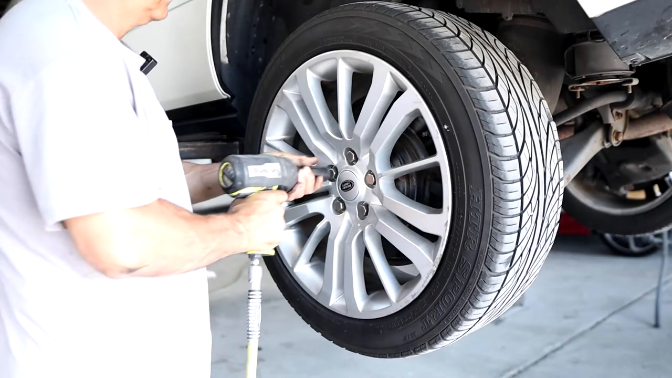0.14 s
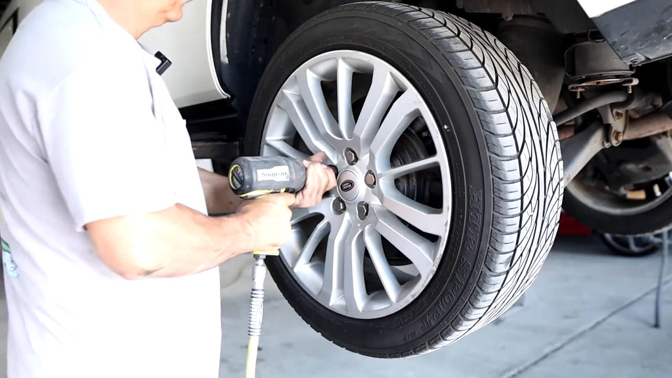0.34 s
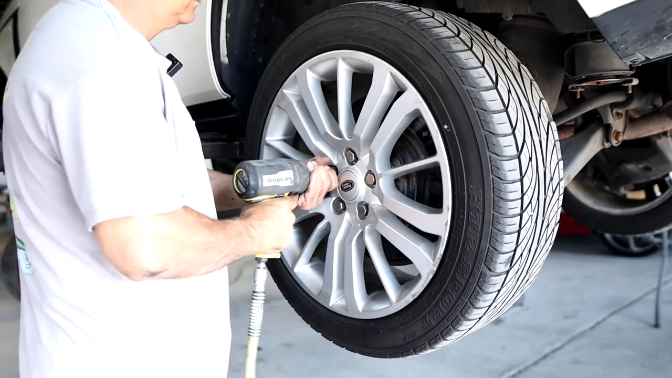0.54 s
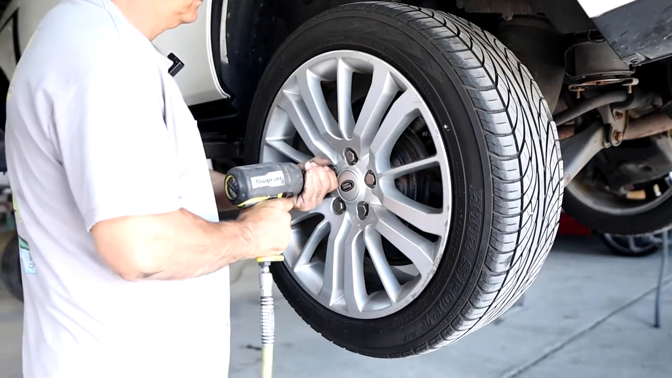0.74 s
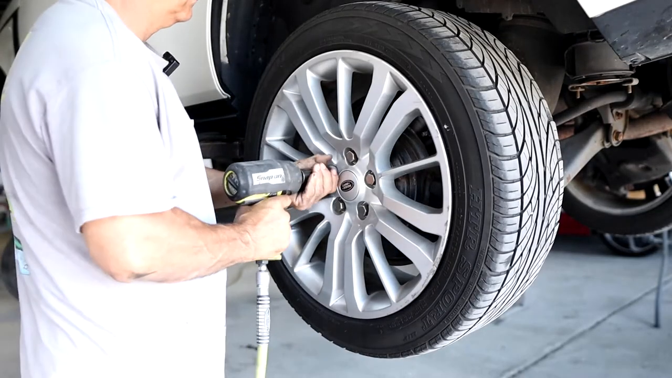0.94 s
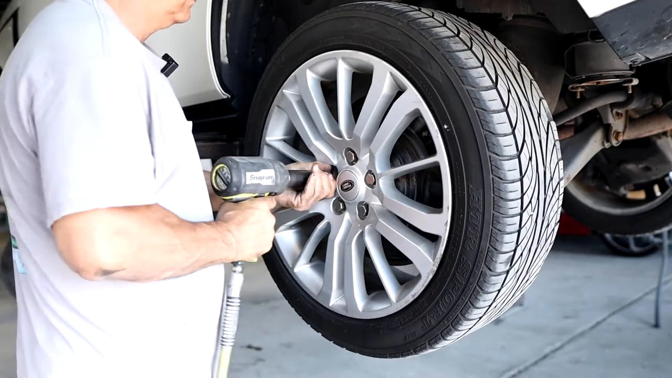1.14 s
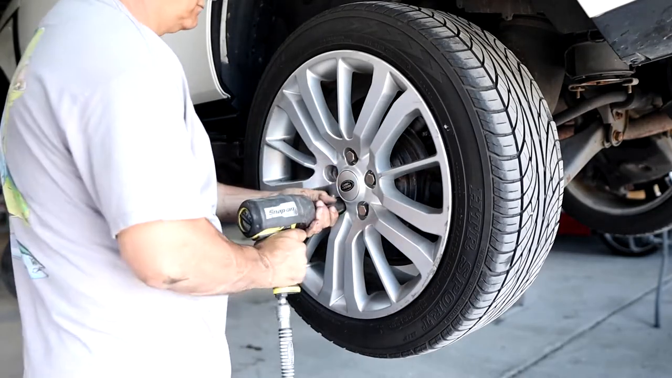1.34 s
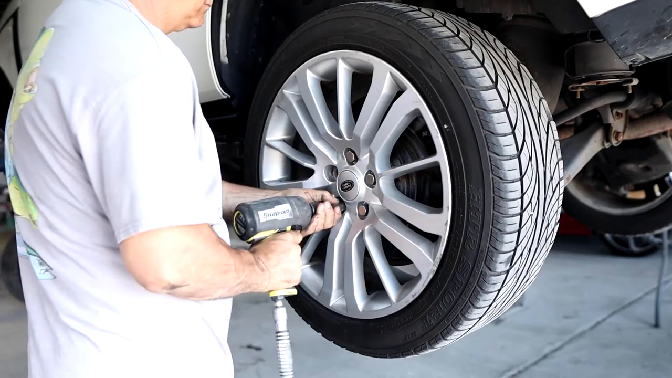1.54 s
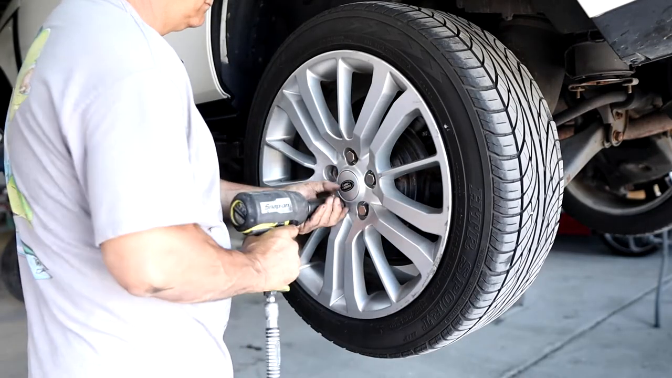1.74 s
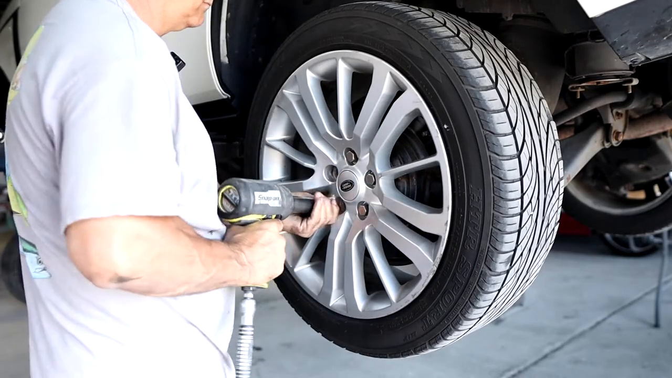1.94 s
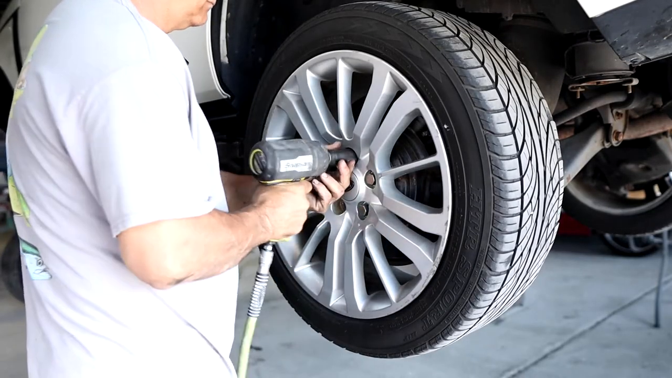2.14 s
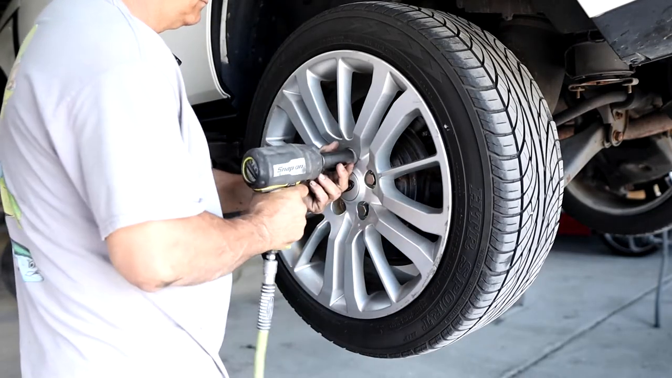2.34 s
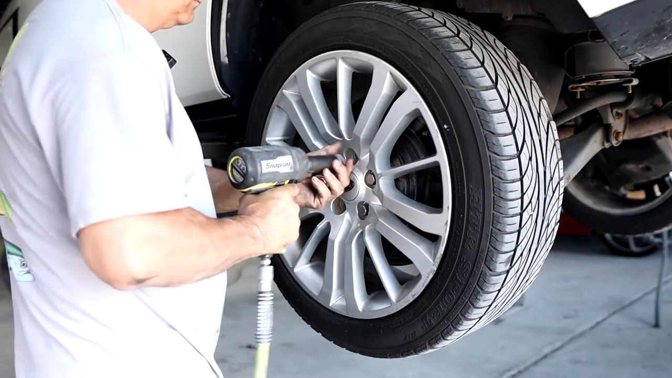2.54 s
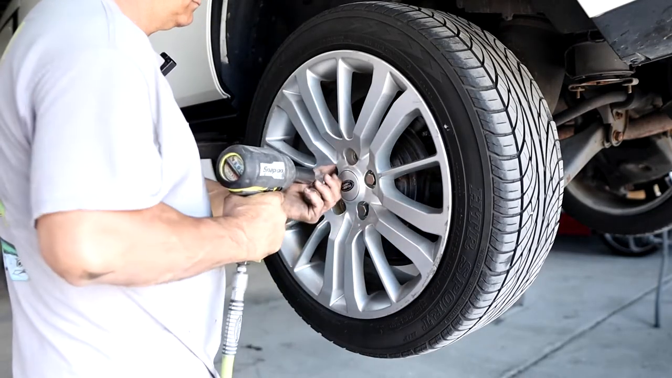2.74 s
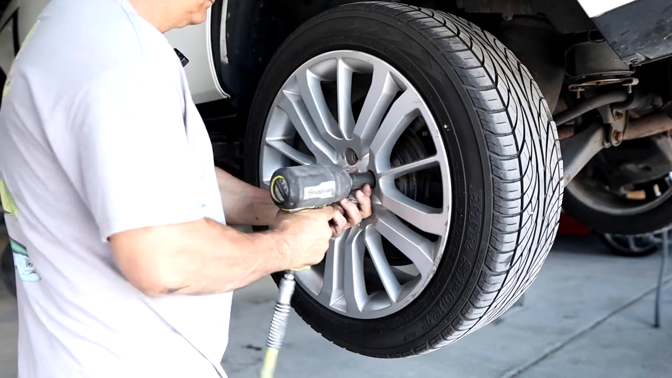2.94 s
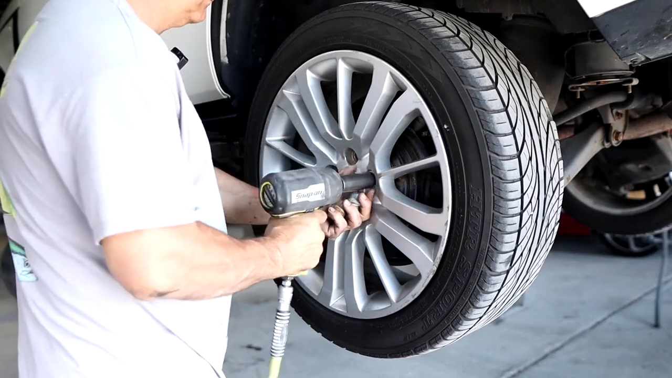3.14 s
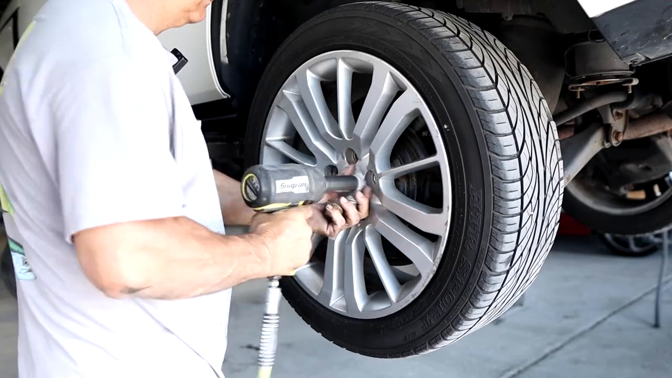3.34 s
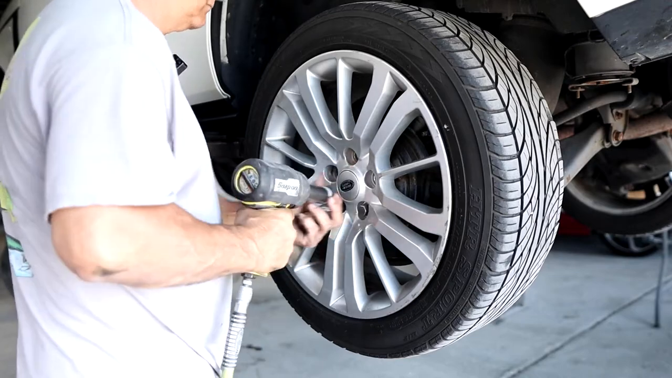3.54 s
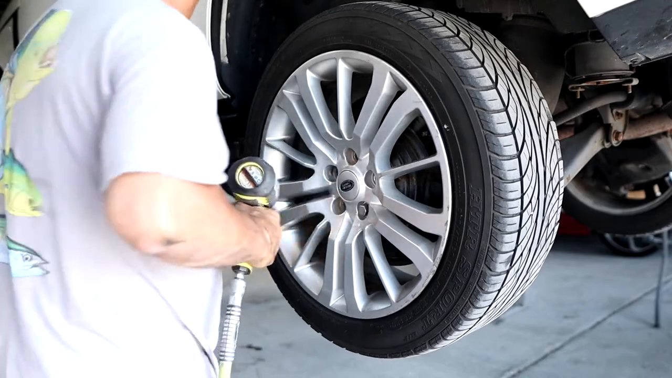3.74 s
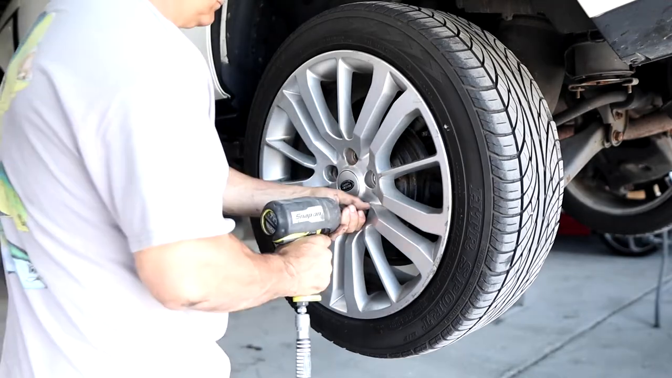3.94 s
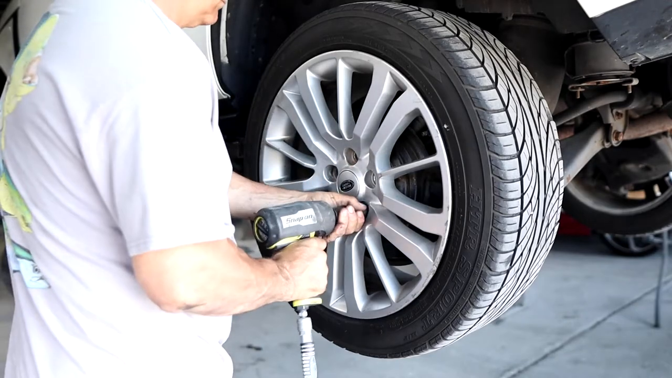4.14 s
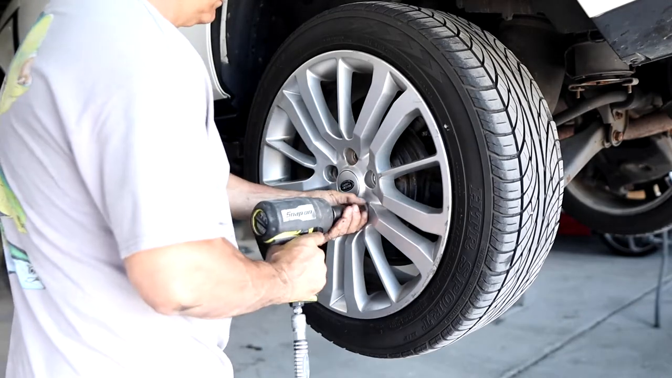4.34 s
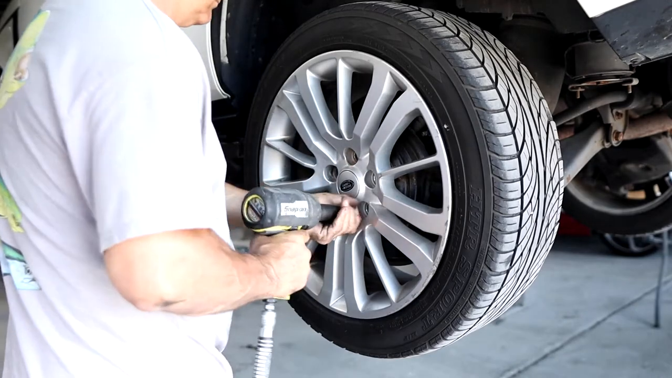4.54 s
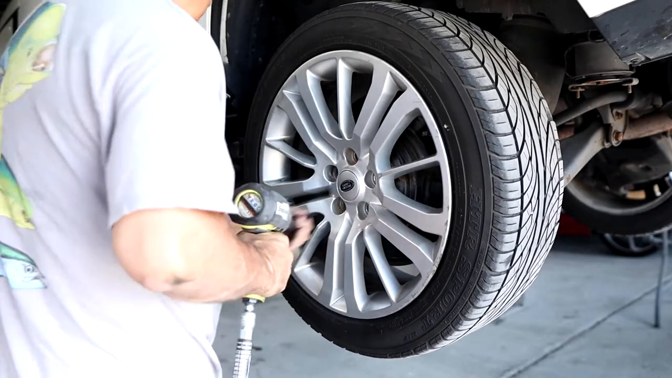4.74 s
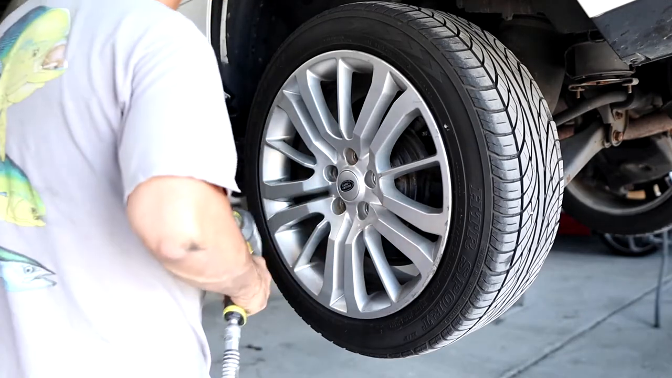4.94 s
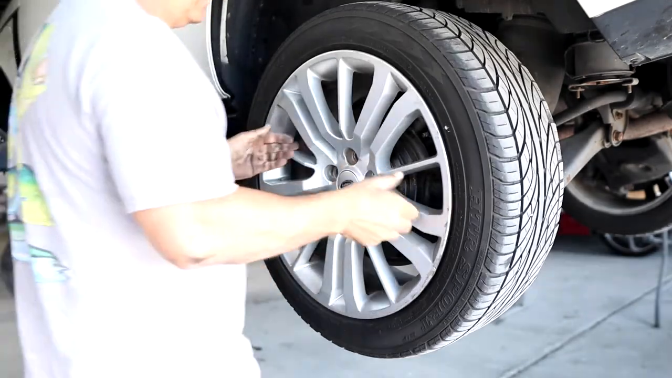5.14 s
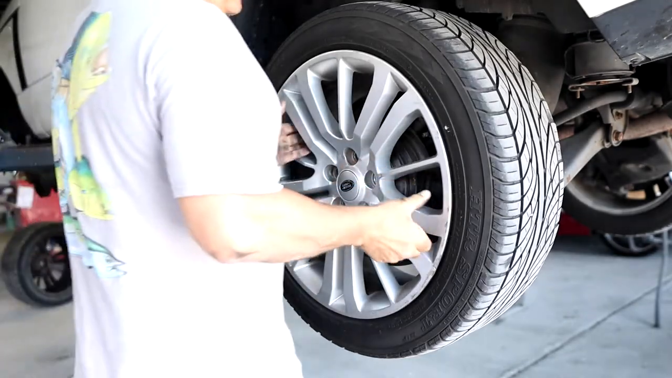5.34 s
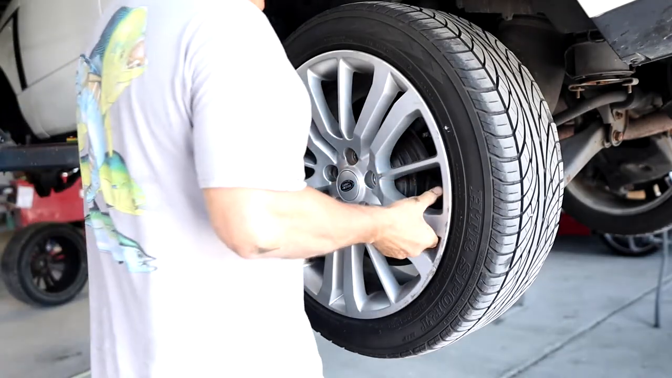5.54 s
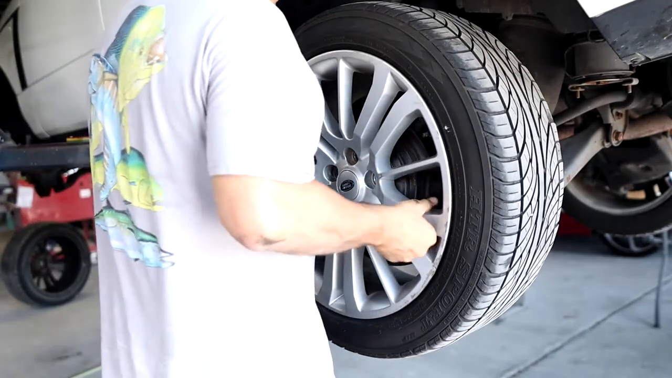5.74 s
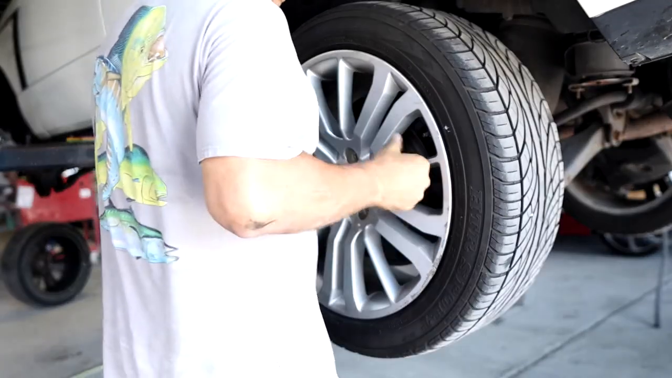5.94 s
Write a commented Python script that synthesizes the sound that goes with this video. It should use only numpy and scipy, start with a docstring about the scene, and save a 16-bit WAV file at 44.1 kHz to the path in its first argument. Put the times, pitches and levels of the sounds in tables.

```python
"""An air impact wrench takes five lug nuts off a car wheel in an open workshop bay, heard close up in mono.
First the socket clinks on nuts and rim: noise bursts and ringing modes. Five bursts follow, clinks in between:
hammer blows (noise and modes) pound the nut loose, the vane motor (harmonic puffs and chopped air noise)
races up, then coasts down while the socket jingles (tuned taps). Near the end a low hum (sines) with a
whistling hiss (noise) sets in with a short low thump and fades. Soft rumble and a faint low drone lie under all."""
import sys
import numpy as np
from scipy import signal
from scipy.fft import rfft, irfft
from scipy.io import wavfile
from scipy.ndimage import uniform_filter1d, minimum_filter1d

SR = 44100
rng = np.random.default_rng(int(sys.argv[2]) if len(sys.argv) > 2 else 0)


def unload_wav(signal):
    """Save mono or channel-first audio to the path in sys.argv[1] as 16-bit WAV at rate SR, clipped to [-1, 1]."""
    wavfile.write(
        sys.argv[1],
        SR,
        np.round(np.clip(np.atleast_2d(signal).T, -1, 1) * 32767).astype(np.int16),
    )


N = 268613
T = np.arange(N) / SR
TAIL_T = T[:SR // 2]  # time axis of every decay

# Levels are relative unless marked; later gains scale them.
# trigger pulls: pressed t/s, first full blow t/s, hammer beat/s, released t/s, free vane rate f/Hz,
# racing tone level/dB, air level/dB, jingle level/dB, jingle length/s
BURSTS = [(0.584, 0.6312, .0352, 0.959, 915, 1.5, -1, -5, .24),
          (1.436, 1.483, .0365, 1.781, 935, -2.5, -1, -4, 0.23),
          (2.156, 2.199, .0317, 2.490, 945, 1.5, -1, 2.5, 0.32),
          (2.982, 3.025, .0355, 3.313, 945, 2, 0.5, 4.5, .37),
          (4.033, 4.0789, .0372, 4.374, 905, -1, -1, -3, .27)]
# blows that break every nut loose: beats after the first full blow, level/dB, vane rate left f/Hz
POUNDING = [(-.5, -25, 267), (0, -14.5, 223.5), (1.002, -15.5, 219), (2.001, -19.5, 288.3)]
# hammer catching again as the nut runs off its thread: t/s, level/dB, vane rate left f/Hz
CATCHES = [(0.7317, -17.5, 417.2), (0.7637, -30, 596), (0.7791, -22, 568), (0.8064, -31, 674),
           (0.852, -21.5, 646), (0.8884, -27.5, 747.1), (1.5918, -22.5, 481.7), (1.6214, -25, 624),
           (1.6437, -22, 651), (1.6771, -26, 689.4), (2.2997, -28, 620), (2.3171, -20, 594),
           (3.1313, -27, 455), (3.1587, -25, 590), (3.2136, -29, 716.4), (4.1869, -19, 470),
           (4.2124, -28.5, 624.3), (4.2393, -23, 579.4), (4.2652, -25.5, 667.6)]
# hammer case and anvil modes: f/Hz, level/dB, t60/s
ANVIL = [(1492, -2, 0.026), (1865, -5, 0.066), (2396, -4.5, 0.045), (2640, -4, 0.1), (3510, -12.5, 0.072),
         (4000, 6, 0.045), (4220, -4, 0.029), (4180, -15, 0.057), (4760, -1.5, 0.076), (5870, 2, 0.028),
         (6900, 0.5, 0.032), (8700, -11, 0.0457)]
# hammer crack spectrum: f/Hz, level/dB (per Hz)
CRACK = [(100, -16), (350, -7), (600, 1.5), (1000, 1), (2000, -3), (3000, -1.5), (4500, 0.5), (7000, -0.5),
         (9500, -4.5), (12500, -13.5), (16000, -19)]
# low thud of the wheel under the hammer, spectrum: f/Hz, level/dB (per Hz)
THUD = [(60, -48), (130, -2), (210, -8), (280, -8.5), (390, 9), (560, -3.5), (830, 9.5), (1150, -19),
        (2000, 0), (5000, -59)]
# exhaust ports and housing, response: f/Hz, level/dB
EXHAUST = [(90, -36), (170, -4.5), (240, -5), (330, 5.5), (450, -2), (550, -7), (660, 2), (850, 3.5),
           (1070, 13), (1300, 11.5), (1650, 13.5), (2050, 7.5), (2600, 5.5), (3500, 0), (7000, -11)]
# exhaust tone against speed: vane rate f/Hz, level/dB
LOUDNESS = [(35, -75.5), (60, -49), (135, -44.5), (230, -31), (330, -24.5), (450, -26), (540, -20.5),
            (630, -25), (880, -23.5)]
# wheel and wheel-arch hollows that sing along: f/Hz, level/dB, t60/s
HOLLOWS = [(261.5, 11, 0.11), (349, -14, 0.043), (846, -1.5, 0.013), (1056, 0.5, 0.061), (1150, 7, 0.16)]
# early echoes off car body and floor: delay/s, level/dB
ECHOES = [(.0031, -22), (.0083, -15), (0.0131, -10), (0.019, -22)]
# air jet spectrum: f/Hz, level/dB (per Hz)
JET = [(40, -31), (90, -12), (160, -3), (400, -0.5), (600, 2), (1000, -9), (1600, -3.5), (2050, -1.5),
       (2700, 1.5), (4300, 3.5), (5400, -4.5), (8000, -4.5), (10000, -8), (15000, -22.5)]
# freed nut scraping round in the socket: peak t/s, time constant/s, level/dB
SCRAPES = [(1.023, 0.011, -39), (1.124, 0.013, -29), (1.98, .012, -54), (2.078, .012, -51),
           (2.569, 0.0099, -35), (3.377, 0.0055, -31.5), (3.455, 0.0089, -36.5), (3.621, 0.02, -47)]
# loudest pings of the loose socket on the spinning anvil: t/s, level/dB, favoured pitch f/Hz
PINGS = [(1.07, -23.5, 9050), (1.7998, -10.5, 7564), (2.4588, -21, 9020), (2.4794, -19, 9130),
         (3.2914, -23, 9040), (3.3214, -21, 8680)]
# socket modes: f/Hz, level/dB, t60/s
SOCKET = [(7810, -9, 0.053), (7870, 2, 0.084), (7690, -6, 0.04), (8700, 1.5, 0.052), (9000, 0.5, 0.079),
          (8920, 6, 0.078), (9100, -2, 0.037)]
# socket and nuts knocking on the wheel: t/s, level/dB, treble tilt/dB, body tilt/dB, rim ring level/dB
CLINKS = [(0.0044, -32.5, -9, 8, -15.5), (0.0334, -27, -1, -13, -25), (0.0466, -26.5, -24, -23, -26),
          (0.109, -26, 10, -25, -32), (0.147, -30, -15, -28, -30), (0.2945, -29.5, -23, -26, -15.5),
          (0.3039, -23, -16, -11, -25), (0.3452, -37, -26, -11, -24), (0.532, -27, -43, -5, -18.5),
          (0.5937, -23, -29, 6, -30), (1.0759, -20, -10, -3, -29), (1.1152, -22, 5, -18, -22),
          (1.1644, -29, -7, -16, -11), (1.442, -24, -26, 1, -38), (1.8876, -16.5, -7, 4, -26),
          (1.9859, -25.5, -5, -9, -28), (2.1639, -17, -1, 18, -28), (2.5634, -20.5, -15, 4, -22),
          (2.7348, -22.5, 7, 9, -23), (2.8894, -31.5, -23, 7, -23), (2.9846, -21.5, 6, 18, -28),
          (3.687, -22.5, -5, -11, -39), (3.7319, -35.5, 4, -5, -20), (3.7605, -44, 16, 3, -36),
          (3.939, -27, -35, 3, -25), (4.048, -18.5, -3, 11, -35), (4.629, -21.5, 12, -17, -23),
          (4.676, -36.5, 8, -5, -22)]
# clink spectrum: f/Hz, level/dB (per Hz)
KNOCK = [(100, -9.5), (300, 15.5), (600, 3), (1000, 7.5), (1600, 4.5), (2600, 2.5), (4000, -2.5),
         (7000, -5), (10000, -12.5), (16000, -47)]
# alloy wheel modes: f/Hz, level/dB, t60/s
WHEEL = [(933.3, 4.5, 0.14), (1310, -24, 0.18), (1920, -5, 0.082), (2430, -8, 0.18), (4080, -8, 0.094),
         (5900, -21, 0.063), (6900, -15, 0.047)]
# light ticks of the socket's edge on a nut: t/s, level/dB, centre f/Hz
TICKS = [(0.253, -52, 2800), (0.306, -38.5, 6440), (0.4132, -44.5, 3550), (2.868, -43, 3572),
         (4.546, -36, 4500), (4.59, -34.5, 3400)]
# late hum lines: f/Hz, level/dB
HUM = [(140.0, -81), (279.9, -59), (349.9, -52), (425.3, -63), (845.2, -63), (985.1, -67)]
# late hiss spectrum: f/Hz, level/dB (per Hz)
HISS = [(24, -40), (40, -14), (137, -1), (243, -12), (283, -29), (312, -33), (354, -0.5), (392, -34),
        (422, -13.5), (600, -7.5), (697, -11), (4340, -23), (16000, -37.5)]
# resonance drifting in the hiss: t/s, f/Hz
WHISTLE = [(5.12, 3400), (5.35, 3850), (5.6, 4260), (5.9, 4470), (6.09, 4500)]
# shop background spectrum: f/Hz, level/dB (per Hz)
SHOP = [(18, -44), (30, -26), (49, -13), (239, -9.5), (311, -11.5), (415, -13), (988, -18.5), (1320, -18.5),
        (2230, -30.5), (7470, -32.5), (8740, -34.5), (9710, -37.5), (16000, -40.5)]
# faint low drone, with a short low thump at 5.13 s as the hum starts: t/s, rms level/dB
DRONE_AND_THUMP = [(0, -68), (.27, -57.5), (.5, -66.5), (3.6, -64), (4.9, -73), (5.1, -63), (5.13, -45),
                   (5.3, -68), (6.09, -63)]

SPIN_UP_S, COAST_S, FRICTION_HZ = 0.08, 0.155, 30.16  # rotor time constants; dry friction ends the coast
AIR_DB, VALVE_S, VALVE_DB = -19.5, 0.038, -17  # valve opens over VALVE_S, from VALVE_DB down
AIR_SAG_DB_PER_S, SHUT_DB, SHUT_S, DRAIN_DB_PER_S = 29, -5.5, 0.026, 72  # hose sags; release drops, drains
JINGLE_DB, JINGLE_LEAD_S, JINGLE_FADE_DB_PER_S = -32.5, 0.016, 46  # starts just before release
HUM_START_S = 5.12
HUM_DB, HUM_HOLD_S, HUM_FADE_DB_PER_S = -49, 0.31, 47
HISS_DB, HISS_HOLD_S, HISS_FADE_DB_PER_S = -52, 0.72, 28
SHOP_DB = -58.5


def wrench(air_db=1, stall_hz=560, choke_db=-13, brake=0.85, brake_s=0.0093, swell_db=3.0):
    """The motor drives exhaust tone and air jet; both sag while the hammer holds the rotor back."""
    hz, phase = rotor()
    tone_gain, jet_gain = levels(hz)
    choked = undb(choke_db * np.clip(1 - hz / stall_hz, 0, 1))  # a slow rotor passes less air
    # every blow on a slow rotor nearly stops the puffs, so the tone comes in short rising chirps
    braked = np.exp(-(since_blow() / brake_s) ** 2) * np.minimum(1, 450 / hz) ** 2
    whine = (1 - brake * braked) * tone_gain * exhaust(hz, phase) * undb(swell_db * walk(53))
    rush = undb(air_db) * choked * jet_gain * air(hz, phase)
    return whine + rush + hammer() + pings()


def hammer(rattle_s=0.0025, crack_t60_s=0.016, crack_db=5, thud_t60_s=0.047, thud_db=-3,
           anvil_db=-10, detune=0.016, grain_db=3):
    """Each blow rattles socket and nut for milliseconds; the anvil rings, its seat varying; the wheel thuds."""
    rattle, thud, steel = np.zeros((3, N))
    held = np.minimum(1, np.exp(-np.log(1000) * (TAIL_T - rattle_s) / crack_t60_s))
    for s, db, _ in blows():
        add(rattle, s, undb(db) * held)
        add(thud, s, undb(db) * fade(thud_t60_s))
        seats = 1 + detune * (2 * rng.random(len(ANVIL)) - 1)
        modes = [(hz * seat, mode_db, t60_s) for (hz, mode_db, t60_s), seat in zip(ANVIL, seats)]
        add(steel, s, undb(db) * ring(modes))
    grains = unit(noise() * undb(grain_db * walk(2700)))
    crack = undb(crack_db) * colour(rattle * grains, CRACK)
    low_thud = undb(thud_db) * colour(thud * noise(), THUD)
    return crack + low_thud + undb(anvil_db) * steel


def blows():
    """Every hammer blow in order: (t/s, level/dB, vane rate left f/Hz)."""
    pounded = [(first_s + beats * beat_s, db, left_hz)
               for _, first_s, beat_s, *_ in BURSTS for beats, db, left_hz in POUNDING]
    return sorted(pounded + list(CATCHES))


def since_blow():
    """Seconds since the hammer last struck."""
    times = np.r_[-1, np.array(blows())[:, 0]]
    return T - times[np.searchsorted(times, T, side="right") - 1]


def speed():
    """Vane rate/Hz: air drives the rotor towards free speed, blows knock it back, on release it coasts."""
    hz = np.zeros(N)
    for pressed, _, _, released, free_hz, *_ in BURSTS:
        end = int(released * SR)
        knocks = [b for b in blows() if pressed < b[0] < released]
        for s, _, left_hz in [(pressed, 0, 0)] + knocks:
            i = int(s * SR)
            hz[i:end] = free_hz + (left_hz - free_hz) * np.exp(-T[:end - i] / SPIN_UP_S)
        hz[end:] = (hz[end - 1] + FRICTION_HZ) * np.exp(-T[:N - end] / COAST_S) - FRICTION_HZ
    return np.maximum(uniform_filter1d(hz, size=100), 1)


def rotor(jitter=0.00322, shake=0.0503, shake_s=0.034):
    """Vane rate and phase: each blow shakes the rotor, most of all while it is still slow."""
    hz = speed()
    grip = np.minimum(1, 430 / hz) ** 2  # the nut holds less as it spins loose
    spread = jitter + grip * shake * np.exp(-since_blow() / shake_s)
    hz = hz * (1 + spread * walk(463))
    return hz, 2 * np.pi * np.cumsum(hz) / SR


def trigger():
    """1 while the trigger is held, else 0, with smoothed edges."""
    held = sum(1. * ((T >= pressed) & (T < released)) for pressed, _, _, released, *_ in BURSTS)
    return uniform_filter1d(held, size=600)


def levels(hz):
    """Gains of tone and air: tone follows speed, air follows the valve; a scraping nut adds to the rush."""
    tone, jet = np.zeros((2, N))
    by_speed_db = np.interp(hz, *np.transpose(LOUDNESS))
    racing = np.clip(hz / 400 - 1, 0, 1)
    for pressed, _, _, released, _, tone_db, air_db, *_ in BURSTS:
        opening_db = VALVE_DB * np.clip(1 - (T - pressed) / VALVE_S, 0, 1)
        sag_db = AIR_SAG_DB_PER_S * np.clip(T - pressed, 0, released - pressed)
        shut_db = SHUT_DB * np.clip((T - released) / SHUT_S, 0, 1)
        flow = undb(AIR_DB + air_db + opening_db - sag_db + shut_db)
        jet += flow * held_note(pressed, released - pressed, DRAIN_DB_PER_S)
        tone = np.where(T >= pressed, undb(by_speed_db + tone_db * racing), tone)
    scrapes = sum(undb(db) * np.exp(-np.abs(T - s) / decay_s) for s, decay_s, db in SCRAPES)
    return tone, jet + scrapes


def exhaust(hz, phase, slope=1.296, slack_slope=0.74, driven_odd_db=-3, coast_odd_db=3, uneven=0.025,
            rough=0.11, slow_rough=0.37, shaft_db=-28, vanes=7):
    """Each vane lets out a puff through the ports; unequal vanes add a flutter once a turn."""
    racing = np.clip(hz / 400 - 1, 0, 1)
    driven = trigger()
    slack = np.clip(1 - hz / 330, 0, 1)  # slow vanes seal badly: soft, uneven puffs
    # odd harmonics: hollow under power, brassy once released
    odd_gain = undb(racing * (coast_odd_db + (driven_odd_db - coast_odd_db) * driven))
    flapping = phase + slack * walk(258)
    falloff = slope + slack_slope * slack
    puffs = np.zeros(N)
    for k in range(1, 17):
        gain = odd_gain if k > 1 and k % 2 else 1
        puffs += gain * np.sin(k * flapping) * np.exp(-falloff * np.log(k))
    turn = np.sin(phase / vanes)
    puffs = puffs * (1 + uneven * turn + (rough + slow_rough * slack) * walk(650))
    ported = hollows(echoes(colour(puffs, EXHAUST)))
    return steady(ported, size=700) + undb(shaft_db) * racing * driven * turn


def hollows(x):
    """Resonances that keep ringing after a partial has swept through them."""
    response = np.zeros(len(TAIL_T))
    for hz, db, t60_s in HOLLOWS:
        decay = fade(t60_s)
        response += undb(db) * 2 * decay / decay.sum() * np.cos(2 * np.pi * hz * TAIL_T)
    return x + convolve(x, response)


def echoes(x):
    """Nearby surfaces comb the sound, so a gliding tone swells and dips."""
    return x + sum(undb(db) * np.interp(T - lag_s, T, x, left=0) for lag_s, db in ECHOES)


def air(hz, phase, pulsing=0.67, flicker_db=2.0, case_db=-11, thin_db=-7, thin_hz=1800):
    """Turbulent jet chopped by the vanes, thinner as the rotor races; the steel case rings along."""
    chopped = noise() * (1 + pulsing * np.cos(phase))
    case = unit(convolve(chopped, ring(ANVIL)))
    jet = unit(unit(echoes(colour(chopped, JET))) + undb(case_db) * case)
    low = signal.sosfiltfilt(signal.butter(2, thin_hz, fs=SR, output="sos"), jet)
    racing = np.clip(hz / 400 - 1, 0, 1)
    thinned = jet - low * (1 - undb(thin_db * racing))
    return thinned * undb(flicker_db * walk(120))


def pings(gain_db=-9, spread_hz=500, detune=0.0226):
    """Each tap favours socket modes near its own pitch; the shifting seat detunes them a little."""
    out = np.zeros(N)
    for s, db, pitch_hz in list(PINGS) + jingle():
        seat = 1 + detune * (2 * rng.random() - 1)
        modes = [(hz * seat, mode_db - 9 * min(abs(hz - pitch_hz) / spread_hz, 2), t60_s)
                 for hz, mode_db, t60_s in SOCKET]
        add(out, s, undb(db + gain_db) * ring(modes))
    return out


def jingle(scatter_db=5, low_hz=7600, high_hz=9250, count=22):
    """Light, uneven socket taps that weaken as the rotor coasts: (t/s, level/dB, pitch f/Hz)."""
    taps = []
    for _, _, _, released, *_, jingle_db, length_s in BURSTS:
        for k, (late, force, spot) in enumerate(rng.random((count, 3))):
            age_s = length_s * (k + late) / count
            db = JINGLE_DB + jingle_db - JINGLE_FADE_DB_PER_S * age_s + scatter_db * (2 * force - 1)
            taps.append((released - JINGLE_LEAD_S + age_s, db, low_hz + spot * (high_hz - low_hz)))
    return taps


def clinks(contact_t60_s=0.024, tail_t60_s=0.22, tail_db=-21, knock_db=-6, tint=0.41):
    """Short steel contacts, dull or bright, that leave the rim ringing."""
    out = np.zeros(N)
    decay = fade(contact_t60_s) + undb(tail_db) * fade(tail_t60_s)
    for s, db, treble_db, body_db, ring_db in CLINKS:
        burst = (decay * rng.standard_normal(SR // 2))[:SR // 6]
        tone = [(hz, level_db + tint * np.interp(hz, [1200, 2500, 6000], [body_db, -4, treble_db]))
                for hz, level_db in KNOCK]
        add(out, s, undb(db + knock_db) * colour(burst, tone))
        add(out, s, undb(db + ring_db) * ring(WHEEL))
    return out


def ticks(t60_s=0.018, skirt_db=-18):
    """Tiny steel contacts, each with one broad resonance."""
    out = np.zeros(N)
    for s, db, hz in TICKS:
        burst = (fade(t60_s) * rng.standard_normal(SR // 2))[:SR // 10]
        peak = [(hz / 10, 2 * skirt_db), (hz / 2, skirt_db), (hz, 0), (hz * 2, skirt_db)]
        add(out, s, undb(db) * colour(burst, peak))
    return out


def bay(x, t60_s=0.53, wet_db=-20, treble_db=-8):
    """Short, dull reverberation of the open bay: decaying noise after a 12 ms gap."""
    tail = fade(t60_s) * rng.standard_normal(SR // 2) * (TAIL_T > 0.012)
    tail = colour(tail, [(200, 0), (1500, 0.0043), (10000, treble_db)])
    return x + undb(wet_db) * convolve(x, tail / np.linalg.norm(tail))


def late_hum(waver=0.003, whistle_db=-18, overtone=1.8):
    """Wavering sine lines and faintly whistling noise set in at once, hold, then fade."""
    clock = np.cumsum(1 + waver * walk(8.4)) / SR
    lines = unit(sum(undb(db) * np.sin(2 * np.pi * (hz * clock + rng.random())) for hz, db in HUM))
    turns = 2 * np.pi * np.cumsum(curve(WHISTLE) * (1 + 0.03 * walk(16))) / SR
    whistle = walk(490) * np.sin(turns) + 0.97 * walk(800) * np.sin(overtone * turns)
    whistle = whistle * undb(3 * walk(9.3))
    hiss = colour(noise(), HISS) * undb(0.91 * walk(25)) + undb(whistle_db) * whistle
    hum = undb(HUM_DB) * lines * held_note(HUM_START_S, HUM_HOLD_S, HUM_FADE_DB_PER_S)
    return hum + undb(HISS_DB) * hiss * held_note(HUM_START_S, HISS_HOLD_S, HISS_FADE_DB_PER_S)


def shop(low_hz=148, sway_db=1):
    """Soft noise rumble and a wavering low sine: a faint drone, with a short thump as the hum starts."""
    low_tone = unit(np.sin(2 * np.pi * np.cumsum(low_hz * (1 + 0.03 * walk(30.0))) / SR))
    rumble = colour(noise(), SHOP) * undb(SHOP_DB + sway_db * walk(2))
    return rumble + low_tone * undb(curve(DRONE_AND_THUMP))


def undb(db):
    """Amplitude gain from dB."""
    return 10 ** (np.asarray(db) / 20)


def unit(x):
    """Scale to rms 1."""
    return x / np.sqrt(np.mean(x ** 2))


def noise():
    """White noise, full length."""
    return rng.standard_normal(N)


def curve(rows):
    """Second column of a table, joined by straight lines in time."""
    rows = np.array(rows)
    return np.interp(T, rows[:, 0], rows[:, 1])


def walk(rate_hz):
    """Smooth random wander of rms 1: white noise averaged twice over 1/rate."""
    k = max(int(SR / rate_hz), 1)
    return unit(uniform_filter1d(uniform_filter1d(noise(), k), k))


def convolve(x, response):
    """Causal convolution cut to the input length."""
    return signal.oaconvolve(x, response)[:len(x)]


def colour(x, points):
    """Minimum-phase filter through (f/Hz, level/dB) points, with unit gain for white noise."""
    hz, db = np.transpose(points)
    freqs = np.linspace(1, SR / 2, 1025)
    cepstrum = irfft(np.log(undb(np.interp(np.log(freqs), np.log(hz), db))))
    half = len(cepstrum) // 2
    folded = np.r_[cepstrum[0], 2 * cepstrum[1:half], np.zeros(half)]
    response = irfft(np.exp(rfft(folded)))
    return convolve(x, response / np.linalg.norm(response))


def fade(t60_s):
    """Exponential decay, half a second long."""
    return np.exp(-np.log(1000) * TAIL_T / t60_s)


def ring(modes):
    """Response of decaying modes to one tap, with random phases."""
    return sum(undb(db) * fade(t60_s) * np.sin(2 * np.pi * (hz * TAIL_T + rng.random()))
               for hz, db, t60_s in modes)


def steady(x, size):
    """Hold a sound near rms 1 over windows of the given size in samples."""
    power = uniform_filter1d(uniform_filter1d(x ** 2, size), size)
    return x / np.sqrt(np.abs(power) + 1e-9)


def held_note(start_s, hold_s, fade_db_per_s):
    """Gain that sets in at once, holds, then fades."""
    onset = uniform_filter1d(1. * (T >= start_s), size=200)
    return onset * undb(-fade_db_per_s * np.maximum(T - start_s - hold_s, 0))


def add(track, s, sound):
    """Mix a sound into a track at s seconds."""
    i = int(s * SR)
    track[i:i + len(sound)] += sound[:N - i]


def scene():
    """Wrench and contacts in the bay, plus hum and shop; both channels alike."""
    mono = bay(wrench() + clinks() + ticks()) + late_hum() + shop()
    return np.array([mono, mono])


def record(dry, limit=0.4, overload=0.205, bass_cut_hz=68, top_hz=16100):
    """A fast limiter and soft overload flatten loud peaks; deep bass and the top are cut."""
    gain = np.minimum(1, limit / (np.abs(dry[0]) + 1e-9))
    held = dry * uniform_filter1d(minimum_filter1d(gain, size=60), size=60)
    held = held / (1 + (held / overload) ** 6) ** (1 / 6)
    held = signal.sosfilt(signal.butter(5, bass_cut_hz, "high", fs=SR, output="sos"), held)
    return signal.sosfilt(signal.ellip(10, 0.2, 80, top_hz, fs=SR, output="sos"), held)


dry = scene()
out = record(dry)
unload_wav(out)
```